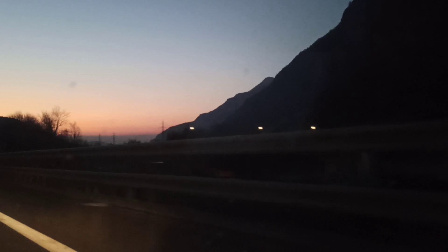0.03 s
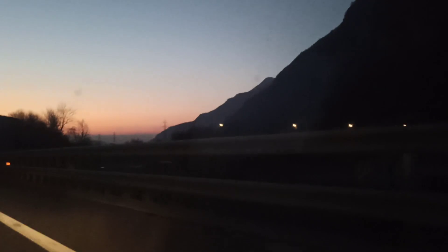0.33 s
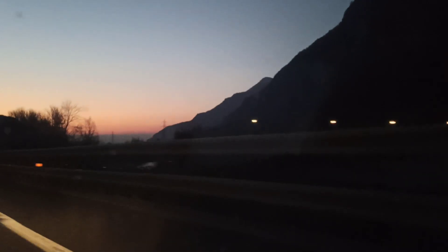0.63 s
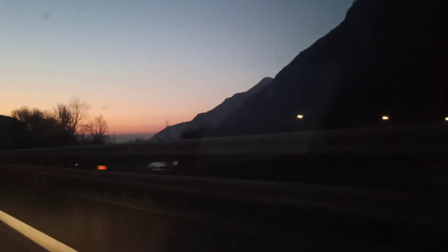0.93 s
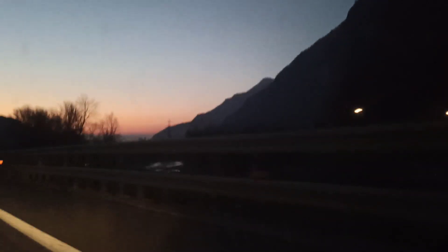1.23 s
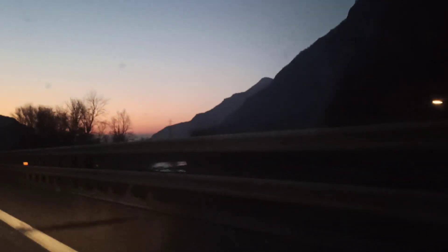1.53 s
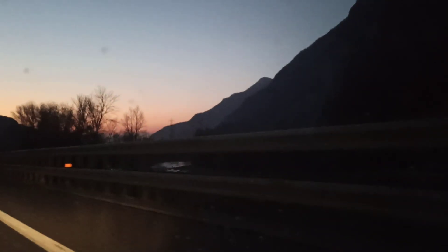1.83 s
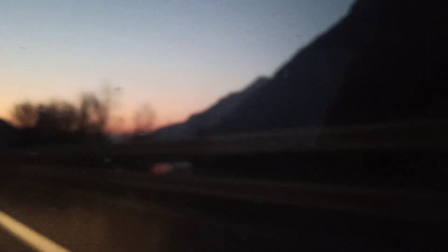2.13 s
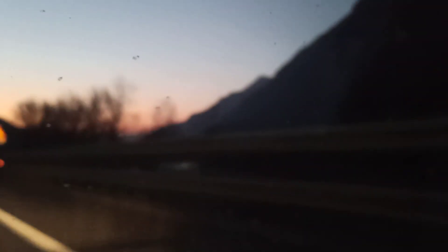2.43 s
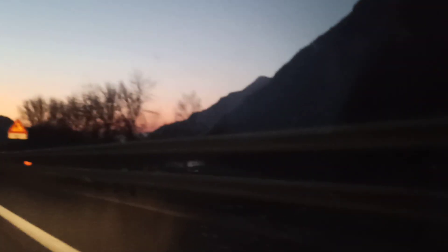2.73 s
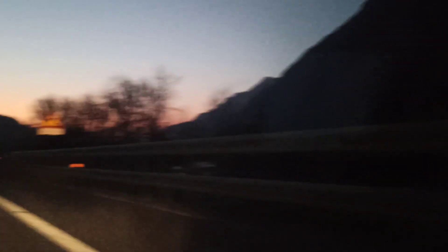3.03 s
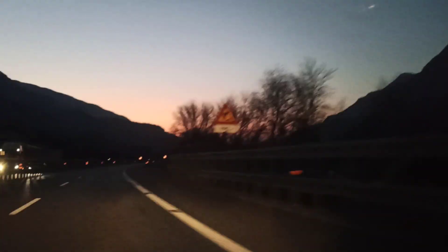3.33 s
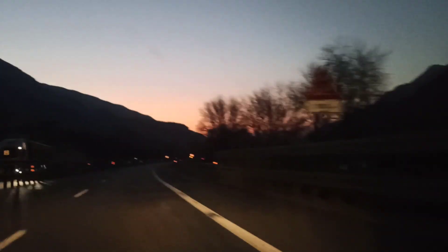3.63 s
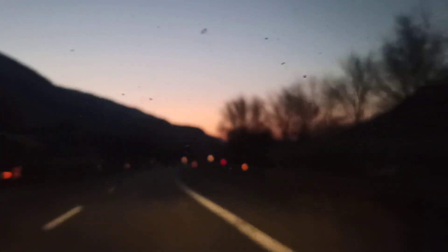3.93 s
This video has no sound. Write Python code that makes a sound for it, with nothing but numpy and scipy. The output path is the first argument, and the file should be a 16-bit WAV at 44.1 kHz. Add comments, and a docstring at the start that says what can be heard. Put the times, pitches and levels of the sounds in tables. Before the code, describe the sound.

A car cruises along a motorway, heard from inside as low tyre and wind rumble with engine hum. Road joints thump in pairs while loose trim rattles. Near the end come two close plastic clicks and a brief low boom.

```python
"""Inside a car cruising on a motorway. Tyre and wind rumble fade in, with the engine's hum beating
against a drone of the wheels. From 0.4 s, road joints thump through the body in pairs about every
0.8 s, the tyres growl and a loose piece of trim rattles. The level ducks a little after the hardest
thump, at 1.2 s. Two sharp plastic clicks come from close by at 3.4 and 3.5 s, then the cabin's air
booms once while a small metal part ticks."""
import sys
import numpy as np
from scipy import signal
from scipy.fft import rfft, irfft
from scipy.io import wavfile
from scipy.ndimage import uniform_filter1d

SR = 44100
rng = np.random.default_rng(int(sys.argv[2]) if len(sys.argv) > 2 else 0)


def log_audio(samples):
    """Write samples as a 16-bit WAV file to the path given in sys.argv[1]."""
    # one column per channel
    frames = np.atleast_2d(samples).T
    # limit to full scale, then quantise
    limited = np.clip(frames, -1, 1)
    pcm = np.round(limited * 32767).astype(np.int16)
    wavfile.write(sys.argv[1], SR, pcm)


N = 176400
T = np.arange(N) / SR
HZ = np.fft.rfftfreq(N, 1 / SR)


def amp(db):
    """Decibels to gain."""
    return 10 ** (np.asarray(db) / 20)


def unit(x):
    """Scales to rms 1."""
    return x / np.sqrt(np.mean(x ** 2) + 1e-20)


def by_hz(points):
    """Reads a table on a log-frequency axis."""
    hz, value = np.transpose(points)
    return np.interp(np.log(HZ + 1), np.log(hz), value)


def by_time(points):
    """Reads a curve at every sample."""
    return np.interp(T, *np.transpose(points))


def colour(x, spectrum):
    """Filters by a spectrum, keeping the power of white noise."""
    return irfft(rfft(x) * unit(amp(by_hz(spectrum))), N)


def drift(rate_hz):
    """Slow random motion, rms 1."""
    return unit(irfft(rfft(rng.standard_normal(N)) * np.exp(-(HZ / rate_hz) ** 2), N))


def pan(left_db):
    """Channel gains for a left-minus-right level."""
    return amp(np.array([[.5], [-.5]]) * left_db)


def strike(start_s, rise_s, fall_s):
    """Envelope of a blow: linear rise, exponential fall."""
    age_s = np.maximum(T - start_s, 0)
    decay = np.exp(-np.minimum(np.maximum(age_s - rise_s, 0) / fall_s, 20))
    return np.minimum(age_s / rise_s, 1) * decay


def swell(centre_s, half_s):
    """Gaussian envelope, peak 1."""
    return np.exp(-((T - centre_s) / half_s) ** 2)


def sine(hz, start_s):
    """Sine with zero phase at start_s."""
    return np.sin(2 * np.pi * hz * (T - start_s))


def resonance(hz, width_hz):
    """Complex response of one mode, peak 1."""
    return 1 / (1 + 2j * (HZ - hz) / width_hz)


def fir(x, kernel):
    """Filters both channels without delay, mirroring the ends."""
    half = len(kernel) // 2
    padded = np.pad(x, ((0, 0), (half, half)), "reflect", reflect_type="odd")
    return signal.oaconvolve(padded, kernel[None], "valid", axes=1)


# Stereo likeness of road noise. Each row: frequency in Hz, correlation from -1 to 1.
CABIN_CORRELATION = [(60, 0.89), (170, 0.88), (340, 0.74), (450, 0.58), (640, -0.005), (800, 0.25),
                     (1050, -0.57), (1500, -0.21), (2200, 0.13), (5000, 0.083), (15000, -0.49)]
# Its balance. Each row: frequency in Hz, left minus right in dB.
CABIN_BALANCE = [(70, 0.5), (200, 0.6), (340, 2), (470, 5), (600, 0), (900, 3), (1400, -2.5), (2500, 1),
                 (5000, 0), (15000, -4)]


def cabin_noise(spectrum):
    """Diffuse noise at two microphones: alike in the bass, much less so in the treble."""
    a, b = rfft(rng.standard_normal((2, N)))
    correlation = by_hz(CABIN_CORRELATION)
    mid = a * np.sqrt((1 + correlation) / 2)
    side = b * np.sqrt((1 - correlation) / 2)
    stereo = irfft(np.array([mid + side, mid - side]) * pan(by_hz(CABIN_BALANCE)), N)
    return unit(colour(stereo, spectrum))


# Road coarseness. Each row: time in seconds, rumble gain in dB.
ROAD_SURFACE = [(0, 0), (.3, 1), (.4, 2.5), (.55, 2), (.68, 1.5), (1.05, 2), (1.17, 4.5), (1.26, 2.5),
                (1.36, -2.5), (1.5, 1), (1.85, 1.1), (2.05, 2.5), (2.35, 0.5), (2.65, 2), (2.85, 1.7),
                (3.0, 2), (3.3, 1.3), (3.5, 3.5), (4, 2.5)]
# Tyre rumble and wind on the glass. Each row: frequency in Hz, relative density in dB.
RUMBLE_SPECTRUM = [(20, -23.5), (42, -23), (52, -21), (63, -11), (90, -1.5), (125, 1), (160, -2),
                   (205, -4.5), (265, -10.5), (300, -5), (350, -5.3), (390, -11.5), (450, -14),
                   (600, -18.5), (850, -24.3), (1200, -32), (2500, -70.5)]
WIND_SPECTRUM = [(200, -19.5), (700, -1), (1100, 0), (1500, -1.5), (2000, -4.5), (2450, -12.5),
                 (4400, -15.5), (5000, -25.5), (5700, -26), (6500, -20.5), (7700, -21.5), (9000, -34),
                 (12000, -37), (15500, -31)]


def road_and_wind(rumble_db=-18, wind_db=-39, flutter_db=0.5, gust_db=1.4, wind_follow=0.64):
    """Tyre rumble and wind follow the road surface and flutter a little."""
    road_db = by_time(ROAD_SURFACE)
    rumble = cabin_noise(RUMBLE_SPECTRUM) * amp(rumble_db + road_db + flutter_db * drift(rate_hz=14))
    wind = cabin_noise(WIND_SPECTRUM) * amp(wind_db + wind_follow * road_db)
    return rumble + wind * amp(gust_db * drift(rate_hz=7.1))


# Engine hum and wheel drone. Each row: frequency in Hz, level in dB, rms pitch wander in Hz.
ENGINE_TONES = [(116.04, -24.5, 1.38), (236.1, -33, 3.77), (354.6, -30.5, 4.16)]
WHEEL_TONES = [(66.8, -33.5, 2.03), (129.07, -20, 1.48), (409.4, -39, 5.08), (475, -46, 5.15)]


def hum(tones, left_db, waver=0.31):
    """Tones of turning parts, wavering in pitch and strength."""
    out = np.zeros(N)
    for hz, db, wander_hz in tones:
        turns = np.cumsum(hz + wander_hz * drift(rate_hz=5.91)) / SR + rng.random()
        strength = 1 + waver * drift(rate_hz=4)
        out += amp(db) * unit(strength * np.sin(2 * np.pi * turns))
    return out * pan(left_db)


# Rough asphalt. Each row: centre in seconds, half length in seconds, level in dB.
ROUGH_PATCHES = [(0.38, .05, -17.5), (0.512, 0.085, -16.5), (1.17, 0.054, -21.5), (2.038, 0.14, -26.5),
                 (2.796, 0.12, -24.5)]
# Tyre growl. Each row: frequency in Hz, relative density in dB.
GROWL_SPECTRUM = [(45, -28.5), (70, -11.5), (130, -2.5), (190, 1.5), (260, -4.5), (340, 0), (480, -15.5),
                  (900, -26.5), (2000, -36), (5000, -74), (12000, -110)]


def tyre_growl():
    """The tyres growl over broken asphalt around the joints."""
    envelope = sum(amp(db) * swell(centre_s, half_s) for centre_s, half_s, db in ROUGH_PATCHES)
    return cabin_noise(GROWL_SPECTRUM) * envelope


def cabin_boom(centre_s=3.66, half_s=.028, hz=131, db=-4):
    """The cabin's air resonance swells and dies once."""
    return amp(db) * swell(centre_s, half_s) * sine(hz, centre_s)


# Ticks of a metal part. Each row: start in seconds, level in dB.
METAL_TICKS = [(.528, -45.5), (3.319, -39), (3.641, -39), (3.702, -46), (3.744, -35.5), (3.853, -44)]


def metal_ticks(ring_hz=6370, width_hz=1200):
    """A small metal part rings briefly on the left."""
    envelope = sum(amp(db) * strike(start_s, rise_s=.002, fall_s=0.0046) for start_s, db in METAL_TICKS)
    ring = unit(irfft(rfft(rng.standard_normal((2, N))) * resonance(ring_hz, width_hz) ** 2, N))
    return envelope * ring * pan(left_db=8.5)


# Broad ring of the trim. Each row: frequency in Hz, relative density in dB.
TRIM_SPECTRUM = [(1200, -46), (2600, -15.5), (3150, -10), (3600, -5.5), (4000, -11), (4450, -6),
                 (5100, -13), (5700, -13), (6200, -3), (7400, -1.5), (7950, -9), (8500, -7.5), (12000, -16),
                 (15500, -14.5)]
# Its narrow modes. Each row: frequency in Hz, height over the broad ring in dB, width in Hz.
TRIM_PEAKS = [(3736, 5.5, 100), (4300, 5.5, 120), (4730, 2.5, 34), (6280, 4, 110), (6950, 3.5, 130),
              (7460, 6, 200), (8400, 4, 130)]
TAP_RISE_S, TAP_FALL_S = 0.00097, 0.0029


def trim_ring(excitation):
    """The trim rings with a broad colour and narrow modes on top."""
    modes = 1 + sum((amp(db) - 1) * resonance(hz, width_hz) for hz, db, width_hz in TRIM_PEAKS)
    return irfft(rfft(colour(excitation, TRIM_SPECTRUM)) * unit(abs(modes)), N)


# Chatter at the jolts. Each row: centre in seconds, half length in seconds, level in dB.
CHATTER_SWELLS = [(1.189, .025, -33.5), (1.215, 0.083, -38), (2.052, 0.13, -50), (2.826, 0.093, -49),
                  (3.647, 0.15, -53.5)]
# Extra colour of tiny taps. Each row: frequency in Hz, relative gain in dB.
CHATTER_EQ = [(3000, 3), (7000, 0), (12500, 2)]


def trim_chatter(taps_per_s=1400, spread_db=4, idle_db=-55.5):
    """Many tiny random taps of the trim, always present and stronger around the jolts."""
    hits = (rng.random(N) < taps_per_s / SR) * amp(spread_db * np.minimum(rng.exponential(1, N), 4))
    power = signal.fftconvolve(hits ** 2, strike(0, TAP_RISE_S, TAP_FALL_S) ** 2)[:N]
    level = amp(idle_db) + sum(amp(db) * swell(at_s, half_s) for at_s, half_s, db in CHATTER_SWELLS)
    grains = unit(np.sqrt(abs(power))) * level * rng.standard_normal((2, N))
    return trim_ring(colour(grains, CHATTER_EQ)) * pan(left_db=3.5)


# Taps of the loose trim. Each row: start in seconds, relative level in dB.
TRIM_TAPS = [(0.262, -38.5), (0.2967, -37.5), (0.3311, -38.5), (0.4787, -40), (0.6868, -31),
             (0.7228, -23.5), (0.7617, -28), (0.7967, -27.5), (0.8783, -27.5), (0.9134, -26.5),
             (0.9506, -26.5), (0.9873, -29), (1.0254, -34), (1.0882, -30), (1.125, -31), (1.1714, -31),
             (1.1881, -18), (1.204, -27), (1.2438, -26.5), (1.2498, -25), (1.274, -33), (1.288, -33.5),
             (1.344, -35.5), (1.7345, -43), (1.7674, -40), (1.9532, -26.5), (1.9738, -34.5), (2.101, -31.5),
             (2.183, -35), (2.5556, -37.5), (2.585, -39), (2.806, -24.5), (2.843, -28.5), (2.878, -39.5),
             (2.9454, -35.5), (3.0686, -34.5), (3.1093, -28.5), (3.242, -37), (3.5937, -35.5)]


def trim_taps(gain_db=0.85, bounce_s=.006, bounce_db=-12, tail_db=-19.5, repeat_share=0.42):
    """Loose trim taps, bounces once and leaves a short tail; part of its ring repeats every time."""
    blows = np.zeros(N)
    for start_s, db in TRIM_TAPS:
        blows[round(start_s * SR)] += amp(db + gain_db)
    tap = strike(0, TAP_RISE_S, TAP_FALL_S)
    bounce = amp(bounce_db) * strike(bounce_s, TAP_RISE_S, TAP_FALL_S)
    tail = amp(tail_db) * strike(0, rise_s=bounce_s, fall_s=0.022)
    power = tap ** 2 + bounce ** 2 + tail ** 2
    burst = np.sqrt(power) * rng.standard_normal((2, N))
    repeated = signal.fftconvolve(blows[None], burst, axes=1)[:, :N]
    fresh = np.sqrt(abs(signal.fftconvolve(blows ** 2, power)[:N])) * rng.standard_normal((2, N))
    excitation = np.sqrt(repeat_share) * repeated + np.sqrt(1 - repeat_share) * fresh
    return trim_ring(excitation) * pan(left_db=1)


# Plastic snaps, three to a click. Each row: start in seconds, level in dB.
CLICK_SNAPS = [(3.414, -29), (3.4251, -22.5), (3.4297, -21.5), (3.5073, -21.5), (3.5109, -21.5),
               (3.515, -26)]
# Their colour. Each row: frequency in Hz, relative density in dB.
CLICK_SPECTRUM = [(900, -13.5), (2000, 1), (2800, -3), (4200, 2.5), (5100, -9), (6500, 4), (7500, 5.5),
                  (8700, -2), (12000, -8.5), (13200, -3.5), (15000, -5)]


def plastic_clicks(rise_s=0.00034, fall_s=0.0012, tail_db=-19, tail_s=.008):
    """Plastic snaps close to the right microphone."""
    envelope = np.zeros(N)
    for start_s, db in CLICK_SNAPS:
        tail = amp(tail_db) * strike(start_s, rise_s, tail_s)
        envelope += amp(db) * (strike(start_s, rise_s, fall_s) + tail)
    return colour(envelope * rng.standard_normal((2, N)), CLICK_SPECTRUM) * pan(left_db=-5)


# Wheels crossing joints. Each row: start in seconds, then thump, knock and slap levels in dB.
JOINT_HITS = [(0.427, -14.5, -20, -38), (.527, -17.5, -10, -37.5), (1.12, -20, -24, -25),
              (1.208, -2.5, -21, -36), (1.949, -22, -27, -32), (2.055, -7.5, -28, -40.5),
              (2.763, -13, -9, -38), (2.86, -6.5, -6.5, -34.5)]
# Low modes of the car body. Each row: frequency in Hz, gain in dB, T60 in seconds.
BODY_MODES = [(68.4, -4, 0.25), (88.4, -1.5, 0.15), (125.7, 4, 0.19), (187.8, -7.5, 0.086),
              (303, -11, 0.071)]
# Tyre slap. Each row: frequency in Hz, relative density in dB.
SLAP_SPECTRUM = [(100, -20), (300, -4.5), (620, -0.5), (1000, -13.5), (2000, -16), (4000, -35.5),
                 (9000, -62)]


def road_joints(knock_hz=339.6):
    """Each joint rings the body's low modes and makes the tyres knock and slap."""
    thumps, slap_envelope = np.zeros(N), np.zeros(N)
    for start_s, thump_db, knock_db, slap_db in JOINT_HITS:
        for hz, mode_db, t60_s in BODY_MODES:
            envelope = strike(start_s, rise_s=0.014, fall_s=t60_s / np.log(1000))
            thumps += amp(thump_db + mode_db) * envelope * sine(hz, start_s)
        thumps += amp(knock_db) * strike(start_s, rise_s=0.0046, fall_s=0.013) * sine(knock_hz, start_s)
        slap_envelope += amp(slap_db) * strike(start_s, rise_s=0.018, fall_s=.05)
    return thumps * pan(left_db=1) + slap_envelope * cabin_noise(SLAP_SPECTRUM)


def scene():
    """Everything heard in the cabin."""
    drive = road_and_wind() + hum(ENGINE_TONES, left_db=2.0) + hum(WHEEL_TONES, left_db=0.9)
    bumps = tyre_growl() + road_joints() + cabin_boom()
    return drive + bumps + trim_taps() + trim_chatter() + metal_ticks() + plastic_clicks()


def duck(x, threshold_db=-8.5, slope=0.45, recover_db_per_s=12, smooth_s=.05):
    """Gain control: cuts a share of the level over the threshold, then recovers slowly."""
    power_db = 10 * np.log10(abs(uniform_filter1d((x ** 2).mean(0), size=900)) + 1e-12)
    fall_db = T * recover_db_per_s
    held_db = np.maximum.accumulate(power_db + fall_db) - fall_db
    over_db = np.maximum(held_db - threshold_db, 0)
    pole = np.exp(-1 / (smooth_s * SR))
    return x * amp(-slope * signal.lfilter([1 - pole], [1, -pole], over_db))


# Microphone bass roll-off and dead band. Each row: frequency in Hz, gain in dB.
MIC_RESPONSE = [(25, -2.5), (44, 0.5), (60, 2.5), (8400, 0), (8850, -20), (9700, -25), (11350, -19),
                (11700, -4)]
# Fade-in, overall and extra for the treble. Each row: time in seconds, gain in dB.
FADE_IN = [(.07, -100), (.082, -27.5), (.13, -15), (.2, -7), (.3, -4), (.38, -4.5)]
TREBLE_FADE_IN = [(.08, 2), (.2, -5), (.32, 0)]


def record(dry, crossover_hz=420, ceiling=.9, cutoff_hz=15900):
    """Microphone colour, fade-in, slow gain control, a soft ceiling and the band limit."""
    mic_impulse = np.roll(irfft(amp(by_hz(MIC_RESPONSE)), N), 4096)[:8193] * np.hanning(8193)
    x = fir(dry, mic_impulse)
    bass = fir(x, signal.firwin(101, crossover_hz, fs=SR))
    treble = (x - bass) * amp(by_time(TREBLE_FADE_IN))
    x = duck((bass + treble) * amp(by_time(FADE_IN)))
    x = x / (1 + (x / ceiling) ** 6) ** (1 / 6)
    return fir(x, signal.firwin(511, cutoff_hz, window=("kaiser", 9), fs=SR))


dry = scene()
out = record(dry)
log_audio(out)
```